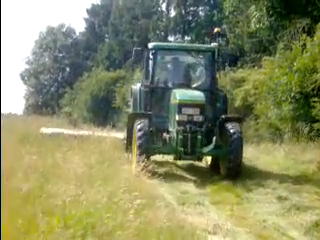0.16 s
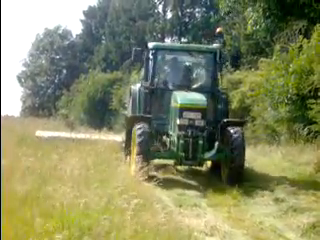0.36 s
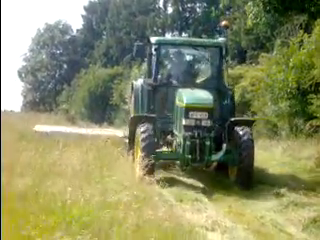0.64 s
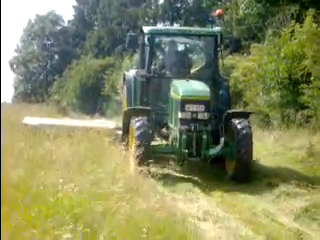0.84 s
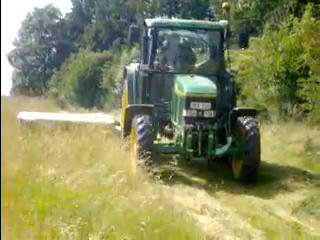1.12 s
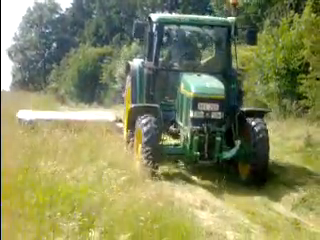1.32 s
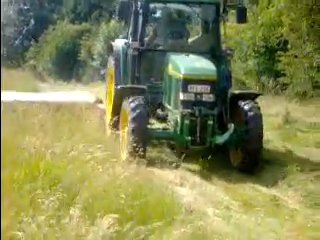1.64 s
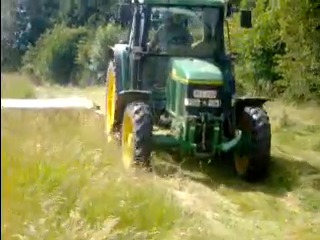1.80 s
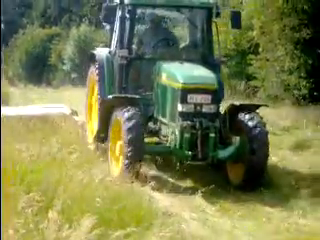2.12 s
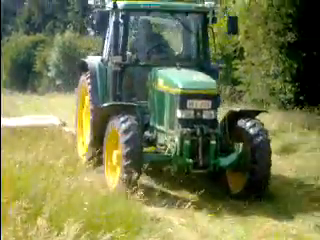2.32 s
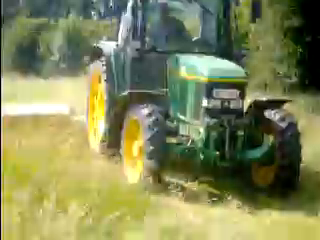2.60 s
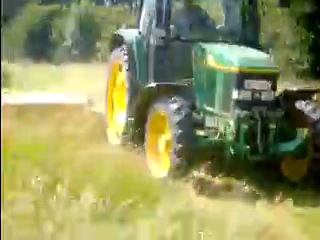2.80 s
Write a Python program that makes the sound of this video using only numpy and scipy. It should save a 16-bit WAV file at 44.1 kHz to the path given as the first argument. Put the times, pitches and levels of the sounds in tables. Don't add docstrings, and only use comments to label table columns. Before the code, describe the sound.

Tractor with disc mower approaching through grass, steady drone, metallic whine and hiss, buffeted by wind.

```python
import sys
import numpy as np
from scipy import signal
from scipy.fft import rfft, irfft, next_fast_len
from scipy.io import wavfile
from scipy.ndimage import uniform_filter1d, map_coordinates

SR = 44100
rng = np.random.default_rng(int(sys.argv[2]) if len(sys.argv) > 2 else 0)


def generate_wav(sig):
    pcm = np.round(np.clip(np.atleast_2d(sig).T, -1, 1) * 32767).astype(np.int16)
    wavfile.write(sys.argv[1], SR, pcm)


def gain_from_db(level_db):
    decades = np.asarray(level_db, float) / 20
    return 10 ** decades


N = 130095

# t/s, machine level/dB, cutting effort/dB
APPROACH = [(0.0, -32.5, -10.5), (0.02, -37.5, -2), (0.15, -38, -6.5), (0.69, -37, -10),
            (0.78, -37.5, -3.5), (0.96, -37, -6), (1.08, -37, -3), (1.35, -35, -8.5), (1.36, -37, -8.5),
            (1.69, -34.5, -3.5), (1.82, -36.5, 3.5), (2.09, -33, -3.5), (2.13, -35, 1), (2.4, -34, -1),
            (2.61, -33.5, -2), (2.69, -31.5, -8), (2.95, -32.5, -1.5)]
# t/s, firing rate f/Hz, blade pass rate f/Hz
SPEED = [
    (0, 88.6, 106.0),
    (.45, 88.9, 106.3),
    (.8, 89.3, 107.0),
    (1.3, 89.6, 107.1),
    (1.75, 89.4, 107.7),
    (2.2, 89.2, 107.1),
    (2.95, 88.6, 107.3),
]
EXHAUST_ORDERS = [1, 2, 3, 13 / 3, 8, 34 / 3, 12.5]
EXHAUST_LEVELS = [-36.5, -54, -56, -56, -54, -54, -53]
BLADE_ORDERS = [1, 2, 3, 4, 5, 6, 7, 9, 10, 11, 12, 15, 21]
# level/dB, growth with approach [dB per dB], t/s when the discs add up best
BLADES = [(-54.5, .5, 2.9), (-50.5, .5, 1), (-53, .8, 2.3), (-47, .3, 1.07), (-47.5, .5, .75),
          (-45.5, 1.3, 2.25), (-51, 1, 3.2), (-51.5, 1, 0.85), (-45.5, .2, 1.03), (-68.5, 1, 1.9),
          (-55.5, 1.2, 2.3), (-51.5, 1, 1.2), (-55.5, 1, 2.2)]
# f/Hz, level/dB
BLOCK = [(60, -32.5), (150, 7), (400, -8), (700, 3), (1100, 0), (1700, -0.5), (2300, -7), (3450, 0.5)]
# f/Hz, width f/Hz, level/dB
BAR = [(2730, 334, -6.5), (3053, 120, 0), (3488, 74, -0.5)]
# f/Hz, level/dB
CHAFF = [(1500, -0.5), (3000, -0.5), (3600, -0.5), (4500, -6), (5500, -10.5)]
# t/s, wind strength level/dB, turbulence level/dB
GUSTS = [(0.0, -22.5, -34.5), (0.03, -37.5, -48), (0.53, -38.5, -43.5), (0.6, -52, -49), (0.66, -47, -28.5),
         (0.93, -35.5, -31.5), (1.02, -39.5, -31), (1.22, -36, -35), (1.31, -56, -54.5), (1.42, -30, -40),
         (1.48, -38.5, -49.5), (1.86, -33.5, -35), (1.89, -31.5, -25.5), (2.18, -33, -50),
         (2.74, -44.5, -28), (2.83, -55.5, -37), (2.9, -38, -27), (2.95, -27.5, -39.5)]
# f/Hz, level/dB
RUMBLE = [(12, -26.5), (30, 0.5), (60, -2.5), (110, -7), (250, -45.5)]
# f/Hz, level/dB
FLUTTER = [(60, -15.5), (110, 3.5), (200, -6), (330, -10.5), (500, -31.5)]
# t/s, peak level/dB, push or pull [+1 or
# -1], width [ms], lean of the swing back [-1 before, +1 after]
THUMPS = [(0.646, -24.5, -1, 8.2, 0.77), (0.674, -13, -1, 2.7, -1.7), (0.712, -17, -1, 2.2, -0.62),
          (0.752, -24, -1, 3.7, -0.29), (0.792, -14.5, -1, 3.4, 0.2), (0.825, -16, -1, 2.5, 0.2),
          (0.867, -18, 1, 2.3, -0.5), (1.004, -16, 1, 5.1, -0.2), (1.031, -17.5, 1, 3.3, -0.81),
          (1.121, -19, 1, 1.5, -0.0), (1.157, -15, 1, 1.95, -0.8), (1.186, -23, -1, 2.7, -0.57),
          (1.878, -22, 1, 1.6, -0.5), (1.903, -21, 1, 2.8, -1.6), (1.95, -20.5, 1, 2.6, 0.7),
          (1.983, -30.5, -1, 3.9, -0.2), (2.019, -38, 1, 1.6, 0.5), (2.467, -17, 1, 2.9, -0.1),
          (2.622, -25, -1, 4.2, 0.84), (2.683, -18.5, -1, 2.7, -0.1), (2.716, -21.5, -1, 1.2, -0.66),
          (2.769, -21.5, -1, 1.5, 1), (2.855, -20, 1, 2.1, -0.8), (2.9, -25, -1, 2.1, 0.8),
          (0.361, -21, 1, 4.5, -1.1),
    (.742, -19, -1, 1.8, 0.089),
    (.749, -21.5, -1, 1.7, -0.69),
    (0.953, -22, 1, 1, 0.065),
    (1.043, -19.5, -1, 1.5, 0.65),
    (1.141, -20.5, 1, 1.6, -0.089),
    (1.166, -22.5, 1, 2.6, 0.77),
    (2.539, -20, -1, 0.96, 0.9),
    (2.69, -17, 1, 1.8, -0.15),
    (2.943, -27.5, -1, 4.4, 0),
]
# f/Hz, level/dB
MIRROR = [(3500, -0.5), (5500, 1), (6850, -4), (7000, -15), (7100, -33.5), (7200, -79)]


def unit(x):
    return x / np.sqrt(np.mean(x ** 2) + 1e-20)


def along(points, hz):
    f, db = np.transpose(points)
    return np.interp(np.log(hz + 1), np.log(f + 1), db)


def curves(rows):
    s, *columns = np.transpose(rows)
    return [np.interp(np.arange(N) / SR, s, column) for column in columns]


def wobble(rate):
    return map_coordinates(rng.standard_normal(4000), [np.arange(N) * rate / SR])


def filtered(x, response):
    m = next_fast_len(N + SR // 4)
    return irfft(rfft(x, m) * response(np.fft.rfftfreq(m, 1 / SR)), m)[:N]


def patchy(depth_db):
    z = signal.stft(rng.standard_normal(N), nperseg=512)[2]
    field = uniform_filter1d(rng.standard_normal(z.shape), size=4, axis=0)
    field = uniform_filter1d(field, size=12, axis=1)
    return signal.istft(z * gain_from_db(depth_db * unit(field)), nperseg=512)[1][:N]


def turns(rate):
    return 2 * np.pi * np.cumsum(rate) / SR


def exhaust(level_db, phase):
    grows, sway_db = 1, 4.5
    rise_db = level_db - level_db.mean()
    hum = np.zeros(N)
    for order, db in zip(EXHAUST_ORDERS, EXHAUST_LEVELS):
        gain = gain_from_db(db + grows * rise_db + sway_db * wobble(6.93))
        hum += gain * np.sin(order * phase + 0.24 * np.sqrt(order) * wobble(5.8))
    return np.sqrt(2) * hum


def clatter(level_db, phase):
    knock_depth, cylinder_db, clatter_db, top_hz = 0.13, 4, 2.5, 3396
    strength = gain_from_db(cylinder_db * np.resize([1, -1], 6) + rng.standard_normal(6))
    cylinder = strength[(phase // (2 * np.pi)).astype(int) % 6]
    knock = 1 + knock_depth * cylinder * (1 - np.cos(phase))
    shaken = filtered(knock * patchy(depth_db=1.2), lambda f: gain_from_db(along(BLOCK, f)) / (1 + (f / top_hz) ** 80))
    return gain_from_db(level_db + clatter_db) * unit(shaken)


def blade_whine(level_db, phase):
    swell_db, swell_s, sway_db, drift_rad = 4.5, 0.35, 2.3, 0.75
    t = np.arange(N) / SR
    rise_db = level_db - level_db.mean()
    whine = np.zeros(N)
    for order, (db, grows, best) in zip(BLADE_ORDERS, BLADES):
        swell = swell_db * np.exp(-((t - best) / swell_s) ** 2)
        gain = gain_from_db(db + grows * rise_db + swell + sway_db * wobble(24.06))
        whine += gain * np.sin(order * phase + drift_rad * wobble(16))
    return np.sqrt(2) * whine


def cutter_bar(level_db, effort_db, passes):
    bar_db, sway_db = -2, 2.5

    def ring(f):
        return sum(gain_from_db(db) * (1j * f * width / (centre ** 2 - f ** 2 + 1j * f * width)) ** 2
                   for centre, width, db in BAR)

    ringing = unit(filtered(passes * patchy(depth_db=0.0), ring))
    return gain_from_db(level_db + effort_db + bar_db + sway_db * wobble(25.12)) * ringing


def cut_grass(passes):
    level_db, rise_db_per_s, rise_end_s = -43, 4, 2.1
    spikes_db = 1.5 * wobble(980) + 0.67 * wobble(150) + 0.5 * wobble(30)
    spikes = gain_from_db(spikes_db) * rng.standard_normal(N)
    chaff = unit(filtered(np.cbrt(passes) * spikes, lambda f: gain_from_db(along(CHAFF, f))))
    return gain_from_db(level_db + rise_db_per_s * np.minimum(np.arange(N) / SR, rise_end_s)) * chaff


def mower(level_db, effort_db, blades):
    slash_depth = 0.28
    phase = turns(blades) + 0.15 * wobble(5)
    passes = 1 + slash_depth * np.cos(phase)
    return blade_whine(level_db, phase) + cutter_bar(level_db, effort_db, passes) + cut_grass(passes)


def ground(x):
    delay_ms, delay_ms_per_s, gain = 1.761, 0.0067, 0.34
    n = np.arange(N)
    lag = (delay_ms + delay_ms_per_s * n / SR) * SR / 1000
    return (x + gain * np.interp(n - lag, n, x)) / np.hypot(1, gain)


def lumpy(colour, rate):
    noise = filtered(rng.standard_normal(N), lambda f: gain_from_db(along(colour, f)))
    return unit(gain_from_db(2 * wobble(rate)) * noise)


def gusts():
    rumble_db, flutter_db = -1.5, -6.5
    strength_db, turbulence_db = curves(GUSTS)
    rumble = gain_from_db(strength_db + rumble_db) * lumpy(RUMBLE, 30.09)
    return rumble + gain_from_db(turbulence_db + flutter_db) * lumpy(FLUTTER, 40)


def eddies():
    thump_db, widen, rebound = 1.5, 0.55, 0.65
    out = np.zeros(N)
    reach = SR // 20
    t = np.arange(-reach, reach) / SR
    for s, db, side, ms, lean in THUMPS:
        u = t / (ms * widen / 1000)
        after = (1 + lean) * np.exp(-(u - 2.4) ** 2 / 4.7)
        before = (1 - lean) * np.exp(-(u + 1.7) ** 2 / 1.1)
        thump = np.exp(-u ** 2 / 2) - rebound * (after + before) / 2
        at = round(s * SR) - reach
        out[at:at + len(t)] += (side * gain_from_db(db + thump_db) * thump)[:N - at]
    return out


def scene():
    level_db, effort_db = curves(APPROACH)
    firing, blades = curves(SPEED)
    phase = turns(firing)
    tractor = exhaust(level_db, phase) + ground(clatter(level_db, phase))
    return (tractor + mower(level_db, effort_db, blades) + gusts() + eddies())[None]


def low_pass(x):
    return signal.sosfilt(signal.butter(12, 8180, fs=SR, output="sos"), x)


def record(dry):
    bend, slower, offset = 1, 4, -0.0639
    machine = filtered(dry[0], lambda f: f > 400)
    bent = dry[0] + bend * (machine ** 2 - np.mean(machine ** 2))
    smooth = filtered(bent, lambda f: f < SR / slower / 2)
    kept = smooth * slower * (np.arange(N) % slower == 0)
    played = filtered(kept, lambda f: gain_from_db(along(MIRROR, f)) * (f < SR / 6))
    return low_pass(played[None] + offset)


dry = scene()
out = record(dry)
generate_wav(out)
```